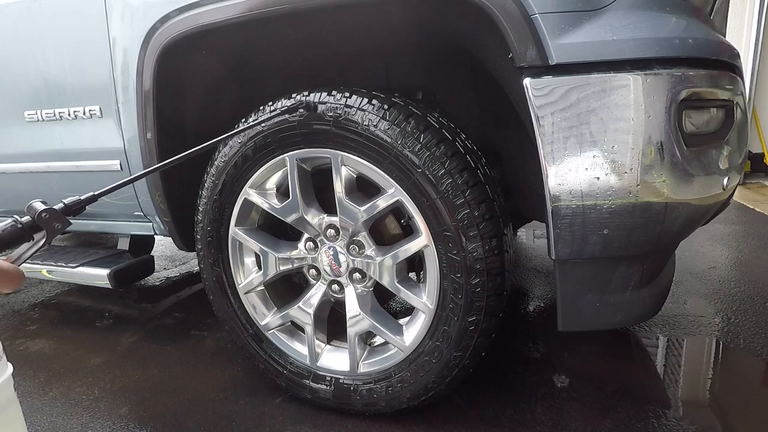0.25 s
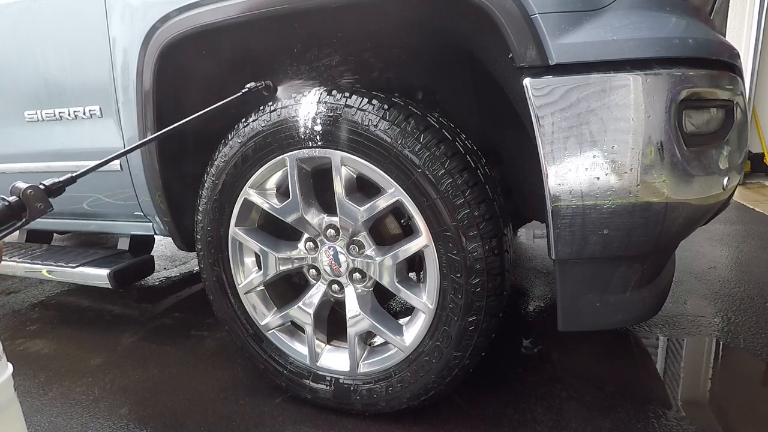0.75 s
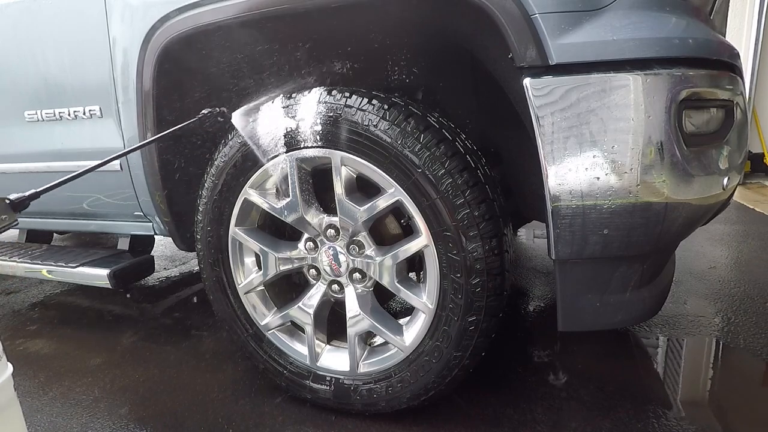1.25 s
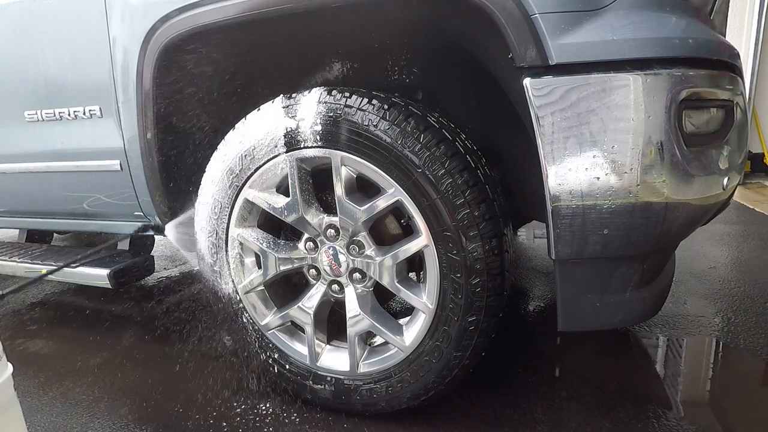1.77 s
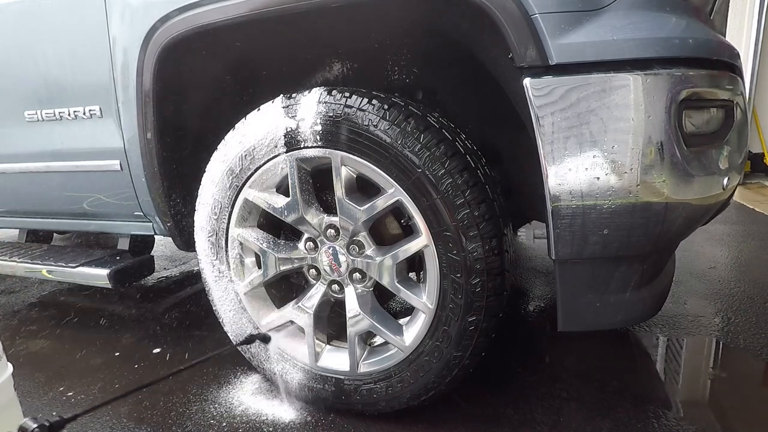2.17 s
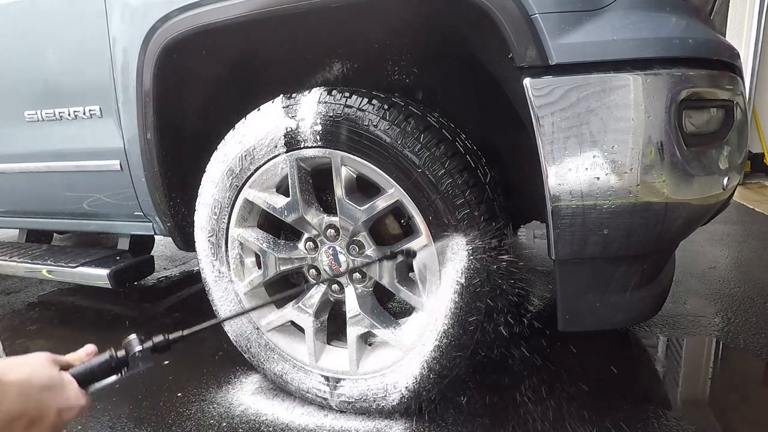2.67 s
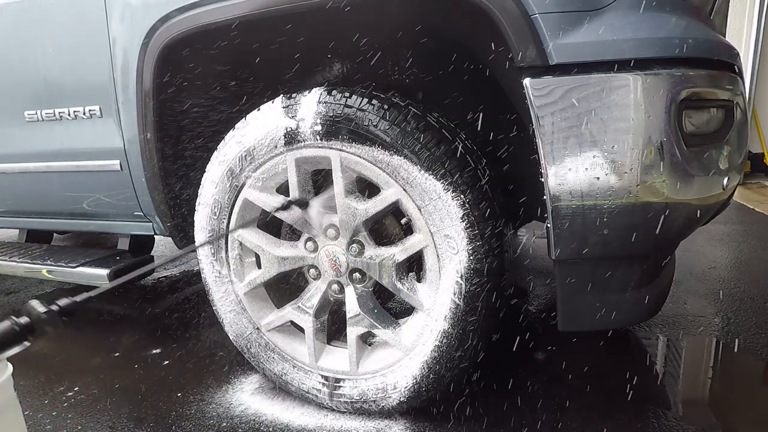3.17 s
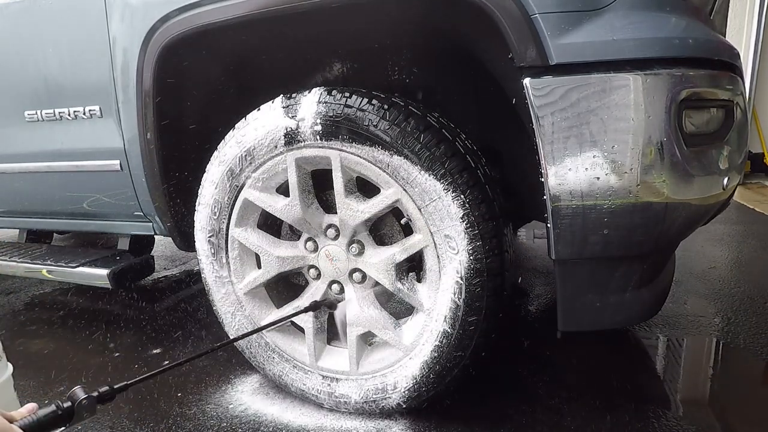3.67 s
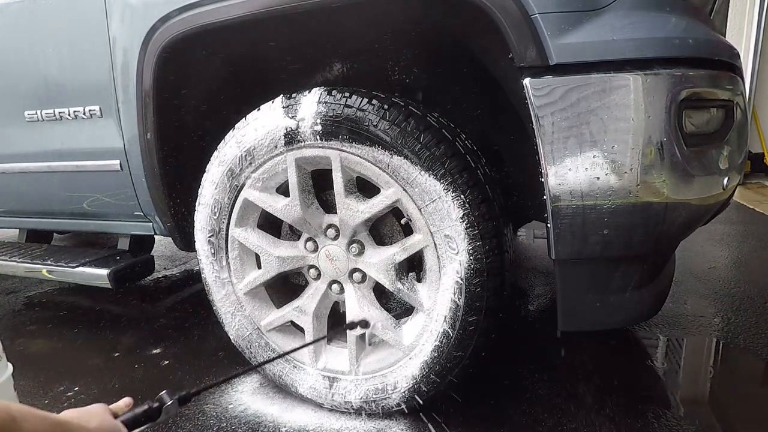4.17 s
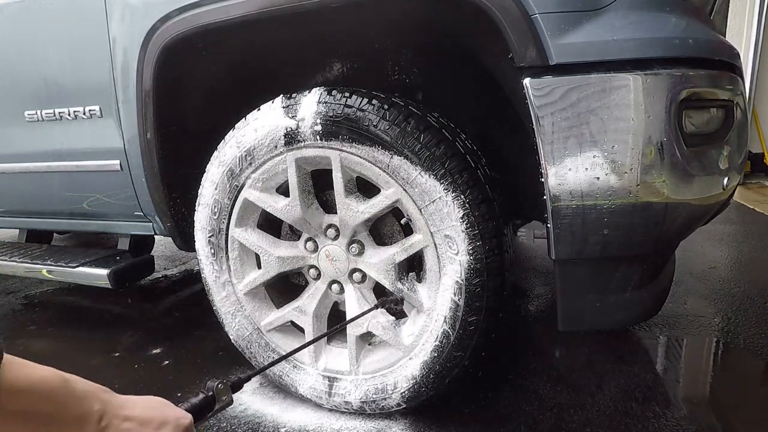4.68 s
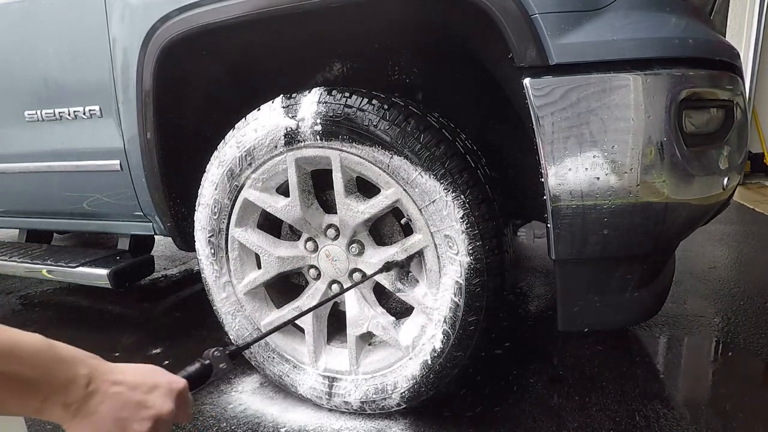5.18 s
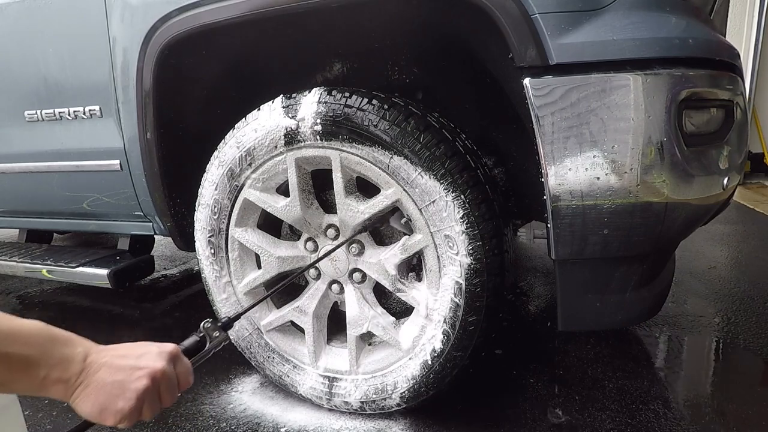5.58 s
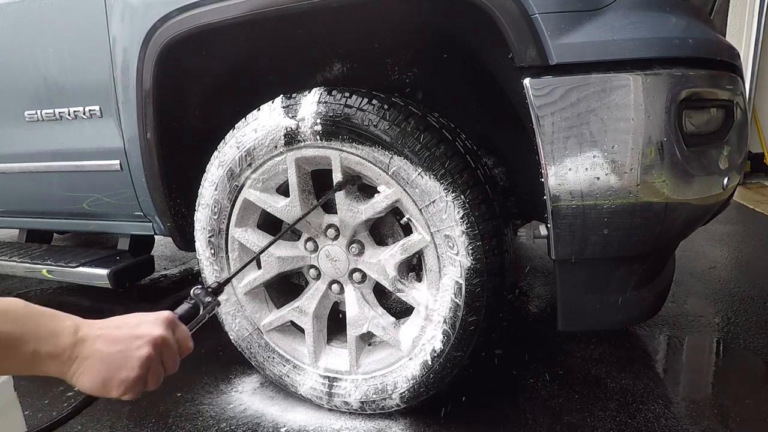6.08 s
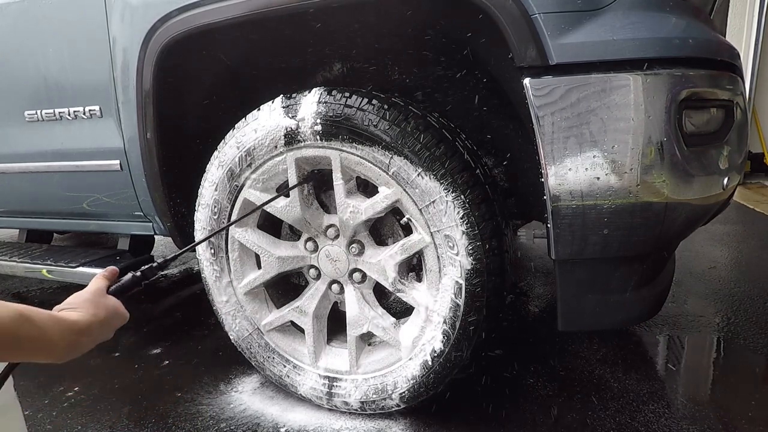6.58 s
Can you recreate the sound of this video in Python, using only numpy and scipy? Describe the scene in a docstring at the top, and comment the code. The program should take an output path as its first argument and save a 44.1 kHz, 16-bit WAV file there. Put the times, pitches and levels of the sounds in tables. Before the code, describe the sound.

Close, wet pressurised hiss sputters into life and sweeps across a tyre and hollow rim, over faint machine hum and low wind buffeting.

```python
"""A foam lance sprays the wheel of a parked truck outdoors, close to a mono microphone.
From the start air sways at the microphone (filtered noise), a machine hums faintly (wavering sines) and the
lance knocks (decaying noise). The nozzle then coughs and hisses steadily; foam rushes over tyre and rim and
splatters in the wheel well (grainy noise with cavity resonances and reflections). Later, spoke edges flare
in short noise bursts. A limiter holds down the loud moments."""
import sys
import numpy as np
from scipy import signal
from scipy.fft import rfft, irfft, next_fast_len
from scipy.io import wavfile
from scipy.ndimage import uniform_filter1d

SR = 44100
rng = np.random.default_rng(int(sys.argv[2]) if len(sys.argv) > 2 else 0)


def digitize_waveform(pressure):
    """Quantize a signal to 16-bit integers and store it at the path in sys.argv[1].

    Rows of a 2-D input are taken as channels; values are limited to [-1, 1].
    """
    field = np.atleast_2d(pressure).T
    bounded = np.clip(field, -1, 1)
    quanta = np.round(bounded * 32767).astype(np.int16)
    wavfile.write(sys.argv[1], SR, quanta)


N = 301718
TIME = np.arange(N) / SR


def amp(db):
    """Amplitude factor from dB."""
    return 10 ** (np.asarray(db) / 20)


def evened(x):
    """Scales x to rms 1."""
    return x / np.sqrt(np.mean(x ** 2) + 1e-20)


def curve(points):
    """A control joined by straight lines in time."""
    return np.interp(TIME, *np.transpose(points))


def held(start_s, end_s, attack_s, release_db_per_s):
    """A gain that rises, holds at 1 until the end, then dies away."""
    rise = np.clip((TIME - start_s) / attack_s, 0, 1)
    return rise * amp(-release_db_per_s * np.maximum(TIME - end_s, 0))


def bell(middle_s, length_s):
    """A smooth hump of height 1, at half height at the two ends of its length."""
    return 0.5 ** np.minimum((2 * (TIME - middle_s) / length_s) ** 2, 100)


def wander(rate_hz):
    """Smooth chance of rms 1, up to about the given rate."""
    hz = np.fft.rfftfreq(N, 1 / SR)
    return evened(irfft(rfft(rng.standard_normal(N)) / (1 + (hz / rate_hz) ** 4), N))


def add(mix, start_s, sound):
    """Adds a sound in place, cut at the end of the mix."""
    part = mix[round(start_s * SR):][:len(sound)]
    part += sound[:len(part)]


def read(points, hz):
    """A spectrum joined by straight lines on a log-frequency axis."""
    point_hz, value = np.transpose(points)
    return np.interp(np.log(hz + 0.1), np.log(point_hz + 0.1), value)


def coloured(x, points):
    """Filters x by a spectrum."""
    size = next_fast_len(len(x) + 8192)
    gain = amp(read(points, np.fft.rfftfreq(size, 1 / SR)))
    return irfft(rfft(x, size) * gain, size)[:len(x)]


def shaped(x, colour_db, patchy_db, size=1024):
    """Gives x a colour (a function of Hz and s) with shifting patches of stronger and weaker eddies."""
    overlap = size * 3 // 4
    hz, t, z = signal.stft(x, SR, nperseg=size, noverlap=overlap)
    patches = uniform_filter1d(rng.standard_normal(z.shape), size=4, axis=0)
    patches = evened(uniform_filter1d(patches, size=7, axis=1))
    z = z * amp(colour_db(hz[:, None], t) + patchy_db * patches)
    return evened(signal.istft(z, SR, nperseg=size, noverlap=overlap)[1][:len(x)])


def hump_db(hz, centre_hz, octaves=0.8):
    """The broad peak of turbulence at an obstacle, of about equal power wherever it sits."""
    return -10 * np.log10((1 + (np.log2((hz + 1) / centre_hz) / octaves) ** 4) * centre_hz)


# Spectra of outdoor noise and wind. Each row: frequency in Hz, relative level in dB.
YARD_SPECTRUM = [(30, 0), (70, -9), (150, -9.5), (400, -11.5), (1400, -12.5), (2500, -20), (6000, -27),
                 (15000, -33.5)]
WIND_SPECTRUM = [(1, 6), (3.5, 6.5), (9, -2), (16, -79), (25, -21.5), (45, -42), (100, -66), (400, -76),
                 (2000, -130)]
# Gusts at the microphone. Each row: start in seconds, end in seconds, level in dB before levelling off.
GUSTS = [(0, 0.092, -8.5), (1.19, 2.038, -12), (3.045, 3.903, -9.5), (4.13, 5.318, -11), (5.412, 6.33, -16)]
CALM_DB, GUST_RISE_S, GUST_DROP_DB_PER_S = -21, 0.11, 127


def air(yard_db=-43, swell_limit=0.48):
    """Dull outdoor noise, and slow swells of air pressure at the microphone, which level off in strong gusts."""
    yard = evened(coloured(rng.standard_normal(N), YARD_SPECTRUM))
    wind = evened(coloured(rng.standard_normal(N), WIND_SPECTRUM))
    gusts = sum(amp(db) * held(start_s, end_s, GUST_RISE_S, GUST_DROP_DB_PER_S)
                for start_s, end_s, db in GUSTS)
    swells = np.hypot(amp(CALM_DB), gusts) * wind
    return amp(yard_db) * yard + swell_limit * np.tanh(swells / swell_limit)


# Lines of the machine hum. Each row: frequency in Hz, relative level in dB.
HUM_LINES = [(192, 1), (384, -7.5)]
# The machine labours, building up slowly, then dropping quickly.
# Each row: start in seconds, end in seconds, level in dB.
HUM_SPELLS = [(.1, 1.24, -49), (2.29, 3.233, -49.5), (4.0, 4.923, -48.5)]
HUM_IDLE_DB, HUM_BUILD_S, HUM_DROP_DB_PER_S = -56.5, 0.52, 83


def hum(waver=0.0037, uneven_db=1.9):
    """A machine drones some way off, swells slowly, drops quickly, and wavers a little in pitch and level."""
    warped_s = np.cumsum(1 + waver * wander(rate_hz=7.3)) / SR
    lines = np.sqrt(2) * sum(amp(db) * np.sin(2 * np.pi * hz * warped_s) for hz, db in HUM_LINES)
    load = sum(amp(db) * held(start_s, end_s, HUM_BUILD_S, HUM_DROP_DB_PER_S)
               for start_s, end_s, db in HUM_SPELLS)
    return lines * np.hypot(amp(HUM_IDLE_DB), load) * amp(uneven_db * wander(rate_hz=7.7))


# Trigger clicks and knocks of the lance.
# Each row: start in seconds, level in dB before the crack's lift, centre in Hz, 60 dB decay in seconds.
KNOCKS = [(0.059, -42, 4930, 0.15), (0.363, -35, 6000, 0.028), (5.978, -26.5, 2580, 0.19),
          (6.045, -23.5, 3300, 0.048), (6.458, -33, 2770, 0.045), (6.469, -24.5, 2360, 0.13),
          (6.671, -26, 3870, 0.027), (6.681, -26, 3000, 0.15)]


def knocks(crack_db=6.0, crack_s=0.0018):
    """Short, dry clacks of plastic and metal: a crack, then a brief rattle."""
    out = np.zeros(N)
    for start_s, db, centre_hz, t60_s in KNOCKS:
        noise = shaped(rng.standard_normal(SR // 4),
                       lambda hz, t: hump_db(hz, centre_hz, octaves=0.75), patchy_db=3)
        t = TIME[:len(noise)]
        level_db = db - 60 * t / t60_s + crack_db * np.exp(-t / crack_s)
        add(out, start_s, amp(level_db) * noise)
    return out


# Spectra of hiss and splatter. Each row: frequency in Hz, relative level in dB.
NOZZLE_SPECTRUM = [(100, -3), (300, -43), (1000, -12), (3000, -8.5), (6000, -1.5), (10000, 1.5),
                   (15000, -1), (20000, -6)]
SPLATTER_SPECTRUM = [(100, -27), (300, -7), (500, -6), (750, -1.5), (1100, 1), (2000, -2.5), (4000, -6),
                     (8000, -40), (16000, -9.5)]
# Colour of the whole spray. Each row: frequency in Hz, gain in dB.
SPRAY_COLOUR = [(6000, 0), (6700, 0.5), (7400, 2), (8300, 5.5), (9500, -1), (11000, -4.5), (13400, 1.5),
                (15400, -5.5)]
# The spray drops briefly between two spokes. Each row: middle in seconds, length in seconds, gain in dB.
DIPS = [(5.181, 0.048, -6), (5.276, 0.031, -7)]


def spray():
    """Foam tears out of the nozzle, rushes over the wheel and lands in wet blobs."""
    hiss_gain, rush_gain, splat_gain, rush_hz = jet_controls()
    sputter_db = 0.29 * wander(rate_hz=220)  # pockets of air in the foam shake hiss and rush
    hiss = shaped(grains(per_s=5000, spread_db=3, share=0.21),
                  lambda hz, t: read(NOZZLE_SPECTRUM, hz) + well_db(hz, t), patchy_db=1.5)
    rush = shaped(grains(per_s=3300, spread_db=2.5, share=0.13),
                  lambda hz, t: hump_db(hz, np.interp(t, TIME, rush_hz)) + well_db(hz, t), patchy_db=2.5)
    splat = shaped(grains(per_s=1000, spread_db=-0.5, share=0.36),
                   lambda hz, t: read(SPLATTER_SPECTRUM, hz) + well_db(hz, t), patchy_db=2.5, size=2048)
    jet = (hiss * hiss_gain + rush * rush_gain) * amp(sputter_db)
    landing = splat * splat_gain * amp(0.82 * wander(rate_hz=17))
    foam = reflected(jet + flares()) + landing
    dips_db = sum(db * bell(middle_s, length_s) for middle_s, length_s, db in DIPS)
    return coloured(foam * amp(dips_db), SPRAY_COLOUR)


# Steady hiss as the lance moves round the wheel, and splatter. Each row: time in seconds, level in dB.
HISS_LEVEL = [(.55, -39), (1.0, -31), (1.1, -17.5), (1.2, -27), (1.7, -26.5), (2.08, -26), (2.53, -19),
              (2.8, -24), (3.12, -27), (3.23, -23), (3.72, -25), (4.15, -25), (4.4, -30.5), (4.93, -22),
              (5.48, -31), (5.77, -21.5), (5.98, -30), (6.1, -25.5), (6.41, -28.5), (6.55, -34.5),
              (6.83, -28.5)]
SPLATTER_LEVEL = [(.55, -38), (1.02, -42), (1.2, -33.5), (1.75, -34.5), (2.07, -31), (2.42, -33),
                  (2.7, -30.5), (3.8, -34), (4.3, -33.5), (5.02, -32.5), (5.28, -37), (5.9, -28.5),
                  (6.1, -31.5), (6.27, -34), (6.45, -31.5), (6.8, -38)]
# The nozzle coughs out trapped air. Each row: start in seconds, length in seconds, hiss in dB,
# sag in dB per second, centre of the rush in Hz, splatter in dB.
COUGHS = [(0.370, 0.15, -16, 71, 3800, -40), (0.580, 0.021, -18, 10, 3700, -31),
          (0.625, 0.021, -18, 10, 4500, -33), (0.665, 0.24, -17.8, 4, 4530, -31),
          (0.953, .026, -21, 10, 5300, -35), (1.016, 0.066, -23.5, 5, 3900, -52)]
# The fan of foam sweeps over tread or spokes and its rush swells.
# Each row: middle in seconds, length in seconds, level in dB, centre in Hz.
SWEEPS = [(0.556, 0.036, -33.5, 3200), (1.076, 0.042, -22.5, 5340), (1.24, 0.23, -25, 7000),
          (1.883, 0.13, -22.5, 6200), (1.95, 0.047, -24.5, 4700), (2.15, 0.068, -24.5, 7900),
          (2.603, 0.077, -22, 5540), (2.923, .035, -24, 5150), (3.02, .07, -24, 5460),
          (3.24, 0.051, -25, 6200), (3.45, 0.075, -24, 5800), (3.65, 0.13, -29, 6500),
          (3.863, 0.093, -23.5, 5500), (4.014, 0.21, -25.5, 4380), (4.16, 0.098, -24.5, 5000),
          (4.34, 0.055, -29.5, 4750), (4.977, 0.29, -26.5, 3900), (5.16, 0.046, -23, 3400),
          (5.215, 0.028, -29, 3180), (5.322, .07, -25, 3780), (5.77, 0.19, -34, 3300),
          (6.092, 0.042, -23, 4540), (6.224, 0.087, -27, 4460), (6.367, 0.093, -26, 5830),
          (6.73, 0.053, -34, 6500)]
OPEN_S = 0.365  # the trigger is pulled
COUGH_ATTACK_S, COUGH_RELEASE_DB_PER_S, COUGH_RUSH_DB = 0.011, 377, -3.5
RUSH_DB, RUSH_OPEN_HZ, RUSH_DEEP_HZ = -7.5, 8200, 2870  # against the hiss; on open tyre, deep inside
SLUG_UNEVEN_DB, SLUG_RATE_HZ = 1.5, 31  # a cough throws its foam in separate slugs
FLARE_SPLATTER_DB = -4  # the splatter is quieter during each flare


def jet_controls():
    """Steady flow, coughs and sweeps add in power: gains of hiss, rush, splatter, and the rush centre in Hz."""
    valve = np.clip((TIME - OPEN_S) / COUGH_ATTACK_S, 0, 1)
    quieter_db = FLARE_SPLATTER_DB * sum(bell(start_s + length_s / 2, length_s)
                                         for start_s, length_s, db, hz in FLARES)
    hiss = (valve * amp(curve(HISS_LEVEL))) ** 2
    splat = (valve * amp(curve(SPLATTER_LEVEL) + quieter_db)) ** 2
    depth = np.clip(curve(ENCLOSURE) - 0.3, 0, 1)
    steady_hz = RUSH_OPEN_HZ * (RUSH_DEEP_HZ / RUSH_OPEN_HZ) ** depth
    rushes = [(hiss * amp(RUSH_DB) ** 2 + 1e-14, steady_hz)]  # pairs of power and centre
    slugs_db = SLUG_UNEVEN_DB * wander(rate_hz=SLUG_RATE_HZ)
    for start_s, length_s, db, sag_db_per_s, centre_hz, splat_db in COUGHS:
        burst = held(start_s, start_s + length_s, COUGH_ATTACK_S, COUGH_RELEASE_DB_PER_S)
        burst = burst * amp(-sag_db_per_s * np.maximum(TIME - start_s, 0))
        hiss = hiss + (burst * amp(db)) ** 2
        splat = splat + (burst * amp(splat_db + slugs_db)) ** 2
        rushes.append(((burst * amp(db + COUGH_RUSH_DB)) ** 2, centre_hz))
    for middle_s, length_s, db, centre_hz in SWEEPS:
        rushes.append((amp(db) ** 2 * bell(middle_s, length_s), centre_hz))
    rush = sum(power for power, hz in rushes)
    rush_hz = sum(power * hz for power, hz in rushes) / rush
    return np.sqrt(hiss), np.sqrt(rush), np.sqrt(splat), rush_hz


def grains(per_s, spread_db, share):
    """Tiny bursts of uneven size in smooth air noise; share is their part of the power."""
    size = amp(spread_db * np.minimum(rng.exponential(1, N), 4)) * rng.choice([-1, 1], N)
    pops = evened(size * (rng.random(N) < per_s / SR))
    return np.sqrt(share) * pops + np.sqrt(1 - share) * evened(rng.standard_normal(N))


# Resonances of the wheel and its well. Each row: centre in Hz, width in Hz, gain in dB at full strength 1.
WELL_RESONANCES = [(457, 45, 4.5), (565, 38, 4.5), (656, 46, 10.5), (769, 22, 9.5), (965, 12, 7),
                   (1025, 21, 2), (1370, 26, -12.5), (1363, 25, 15.5), (1570, 44, 1), (1774, 22, 7),
                   (3170, 130, 0.5), (3840, 53, -0.5), (5550, 50, 3.5), (7680, 57, 3.5)]
# How far the nozzle reaches into the arch or between the spokes.
# Each row: time in seconds, strength of resonances and reflections as a factor.
ENCLOSURE = [(.4, 1.3), (.55, 0.65), (.65, 1.4), (1, 1.17), (1.3, 0.32), (3.5, 0.11), (4, 1.36), (6.8, 1.1)]


def well_db(hz, t):
    """Gain of the cavity resonances, stronger while the nozzle is deep inside."""
    depth = np.interp(t, *np.transpose(ENCLOSURE))
    return depth * sum(db / (1 + (2 * (hz - centre_hz) / width_hz) ** 2)
                       for centre_hz, width_hz, db in WELL_RESONANCES)


def reflected(x, wet=0.47, t60_s=0.12, count=64):
    """Dense reflections from arch, tyre and rim comb the hiss; their pattern changes as the lance moves."""
    t = TIME[:SR // 16]
    place = TIME / TIME[-1] * (count - 1)
    echoes = np.zeros(N)
    for k in range(count):
        taps = rng.choice([-1, 1], len(t)) * (rng.random(len(t)) < 0.1) * (t > 0.001)
        taps = taps * amp(-60 * t / t60_s)
        here = np.cos(np.pi / 2 * np.clip(place - k, -1, 1))  # crossfade between patterns
        echoes += signal.oaconvolve(x * here, taps / np.linalg.norm(taps))[:N]
    # reflections kept to the upper band; the resonances colour the low band
    echoes = signal.sosfilt(signal.butter(2, 1100, "high", fs=SR, output="sos"), echoes)
    share = wet * curve(ENCLOSURE)
    return (x + share * echoes) / np.sqrt(1 + share ** 2)


# The jet catches an edge of the rim.
# Each row: start in seconds, length in seconds, level in dB, centre in Hz.
FLARES = [(4.051, 0.024, -10.5, 5660), (4.12, 0.043, -17, 4330), (4.824, 0.04, -19.5, 6600),
          (4.853, 0.03, -18, 4700), (5.052, 0.032, -12, 4230), (5.077, 0.037, -14.5, 6500),
          (5.107, 0.036, -17, 4330), (5.68, 0.041, -21, 7100), (5.743, 0.094, -27, 3380),
          (6.171, 0.054, -16.5, 5200), (6.803, 0.074, -21.5, 5900)]


def flares(fade_s=0.011, lowest_hz=2750):
    """Each edge that cuts the jet gives a short, loud rush with no low body."""
    out = np.zeros(N)
    for start_s, length_s, db, centre_hz in FLARES:
        def colour_db(hz, t):
            low_cut_db = -10 * np.log10(1 + (lowest_hz / (hz + 1)) ** 10)
            return hump_db(hz, centre_hz, octaves=0.61) + low_cut_db
        noise = shaped(rng.standard_normal(SR // 4), colour_db, patchy_db=1.5)
        t = TIME[:len(noise)]
        gate = np.clip(np.minimum(t, length_s + fade_s / 2 - t) / fade_s, 0, 1)
        add(out, start_s, amp(db) * noise * np.sin(np.pi / 2 * gate) ** 2)
    return out


def scene():
    """Everything reaches one microphone, given as two equal channels."""
    mono = air() + hum() + knocks() + spray()
    return np.array([mono, mono])


def record(dry, limit_db=-13.5, recover_db_per_s=140, edge_hz=15400):
    """A quick limiter that listens above the wind, then the band limit."""
    sensed = signal.sosfilt(signal.butter(2, 100, "high", fs=SR, output="sos"), dry[0])
    power_db = 10 * np.log10(abs(uniform_filter1d(sensed ** 2, size=300)) + 1e-12)
    fall_db = TIME * recover_db_per_s
    peak_db = np.maximum.accumulate(power_db + fall_db) - fall_db  # peaks, released at a steady rate
    over_db = np.maximum(peak_db - limit_db, 0)
    limited = dry / amp(uniform_filter1d(over_db, size=400))
    low_pass = signal.firwin(1023, edge_hz, window=("kaiser", 9), fs=SR)
    return signal.oaconvolve(limited, low_pass[None], "same", axes=1)


dry = scene()
out = record(dry)
digitize_waveform(out)
```